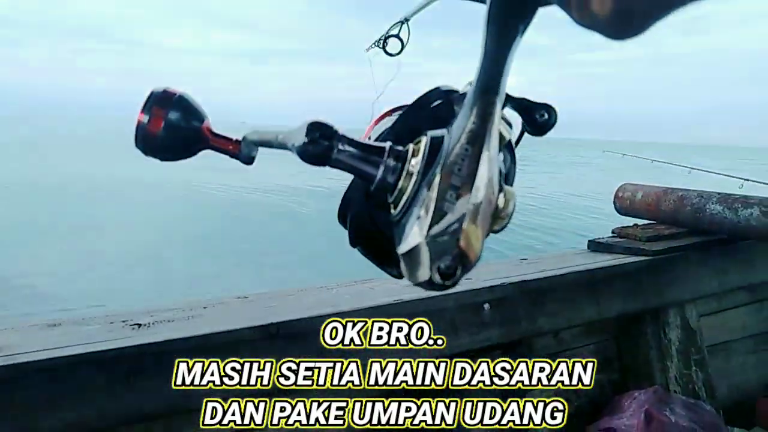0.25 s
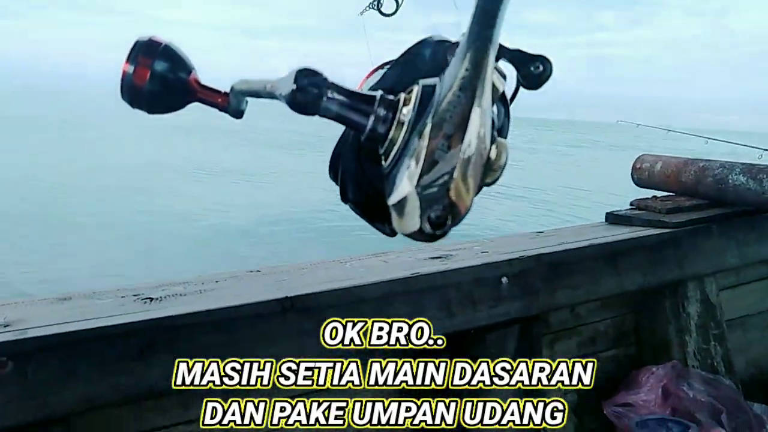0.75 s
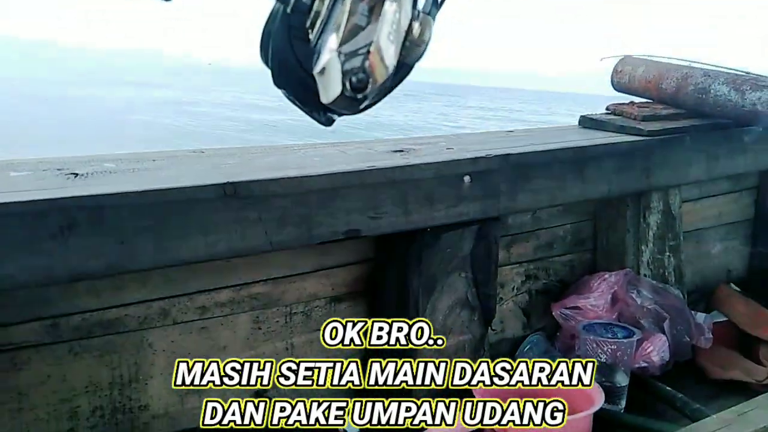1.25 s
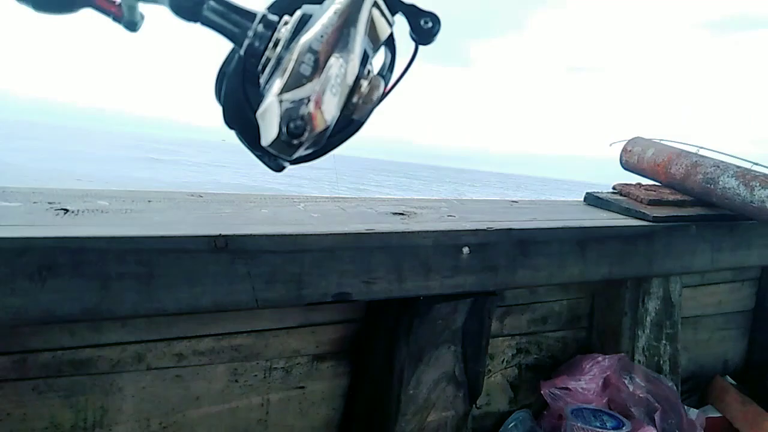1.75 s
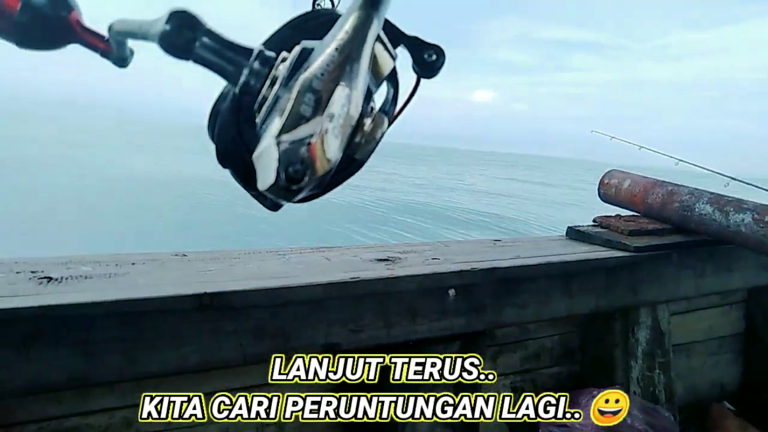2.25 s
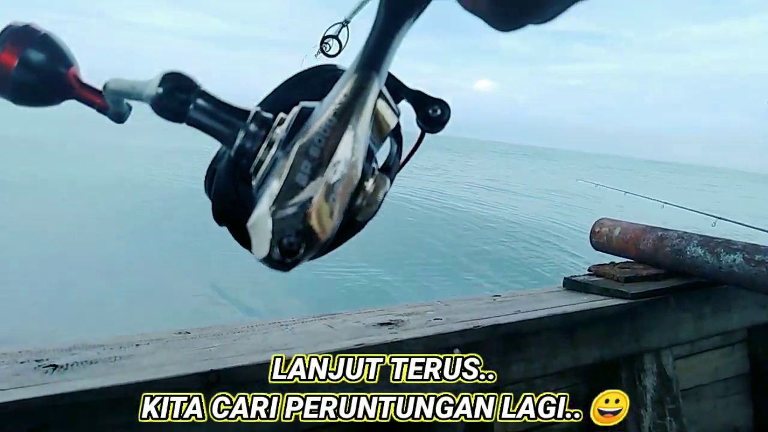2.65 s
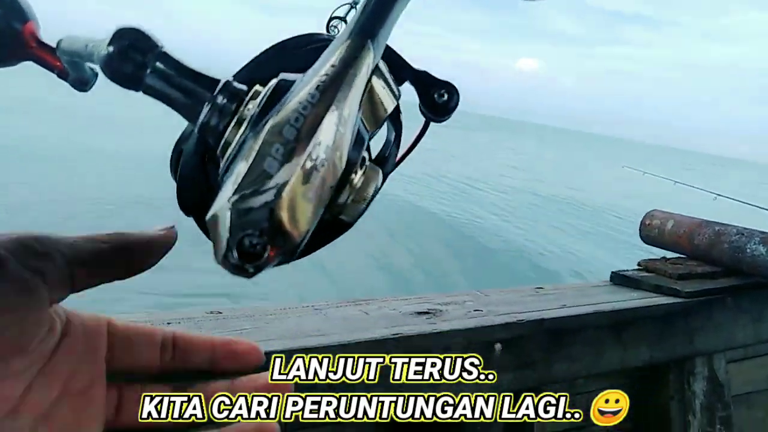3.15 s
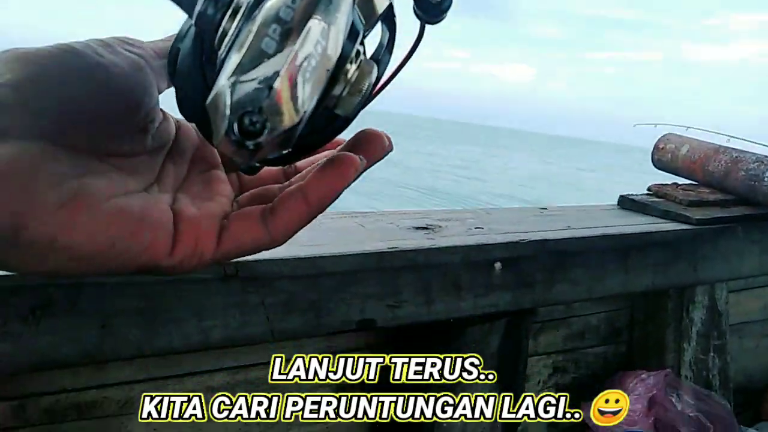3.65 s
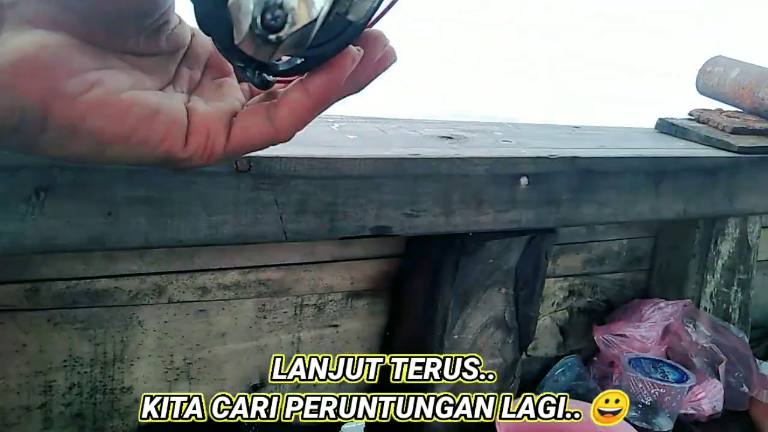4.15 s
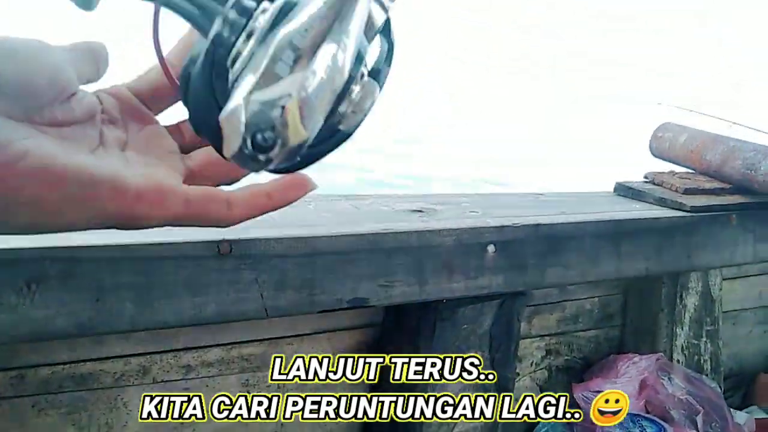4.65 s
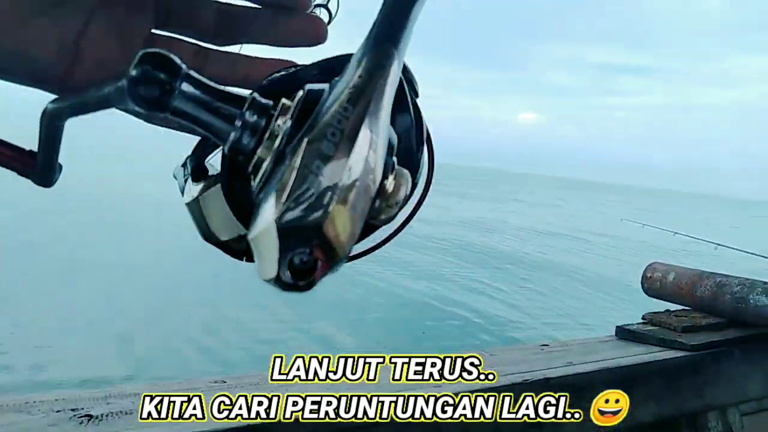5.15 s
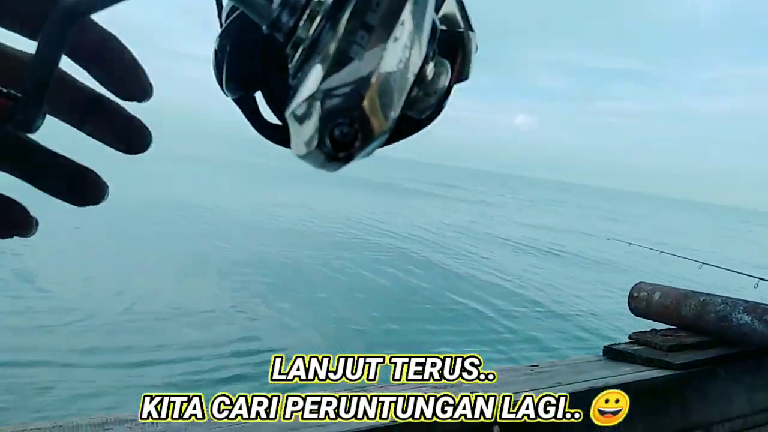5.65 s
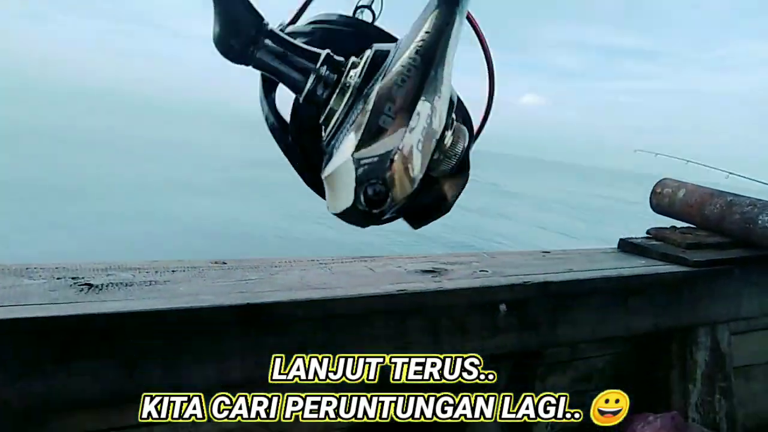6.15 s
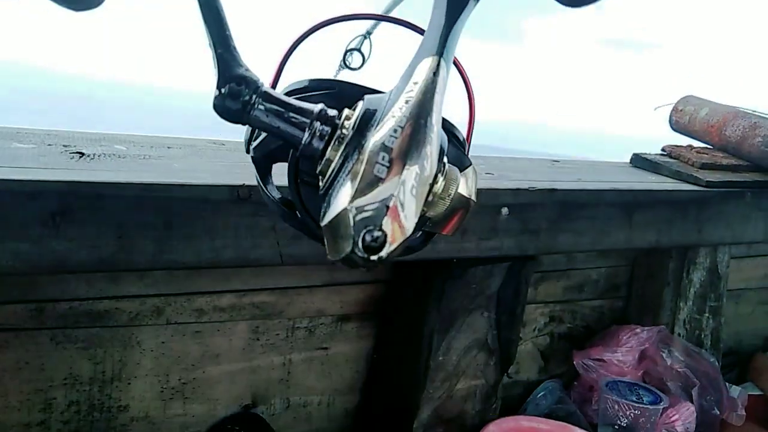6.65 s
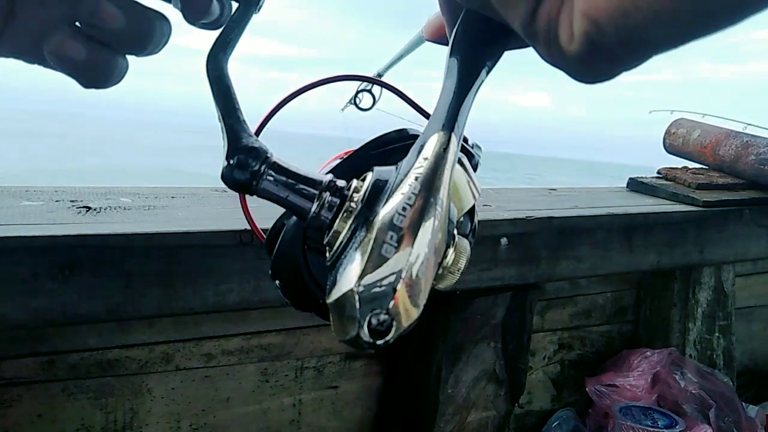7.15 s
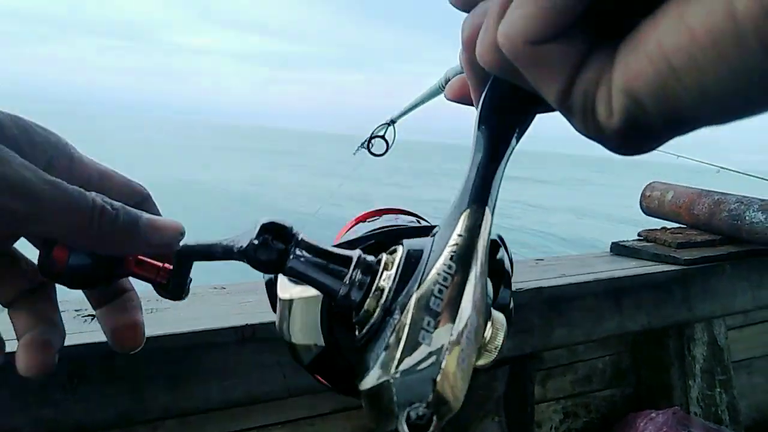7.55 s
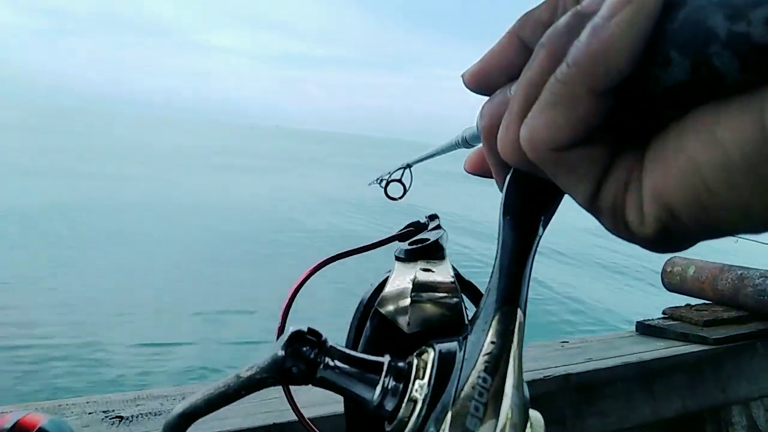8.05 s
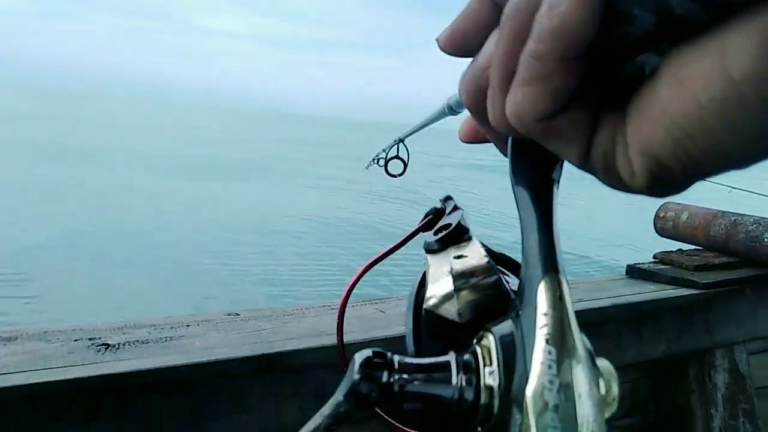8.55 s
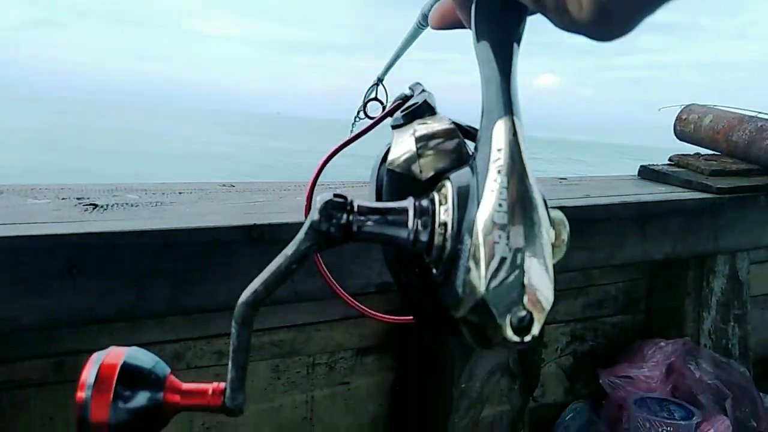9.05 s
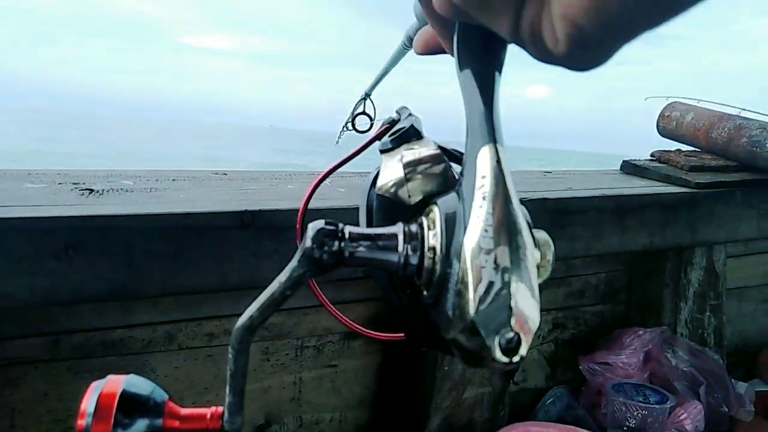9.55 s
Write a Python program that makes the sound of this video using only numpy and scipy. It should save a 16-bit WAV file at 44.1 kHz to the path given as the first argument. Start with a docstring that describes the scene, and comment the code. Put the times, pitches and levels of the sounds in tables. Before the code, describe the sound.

Low, nearly constant rumble and faint hiss lie under lively bubbling water against a hull. Irregular wavelets swell, slap and drain, leaving single plops in the lulls. Small reel ticks come and go nearby. A hard, bright metal clack bursts out just before the middle, briefly ducking everything after it. Late on, heavy tackle bangs hollow planks several times in quick succession. Close outdoor microphone, short boat echoes.

```python
"""Waves and a fishing reel on a wooden boat

Small waves slosh, slap and gurgle against the planks, over low rumble, sea wash and faint whistling hiss.
Water is coloured noise and swarms of dying sine bubbles; blows are decaying modes and noise bursts.
Close by, a reel ticks, its bail snaps shut and tackle knocks on the wood.
The recorder's peak limiter ducks the loudest hits and what follows them."""
import sys
import numpy as np
from scipy import signal
from scipy.io import wavfile

SR = 44100
rng = np.random.default_rng(int(sys.argv[2]) if len(sys.argv) > 2 else 0)


def transcribe(signal):
    """Save signal, clipped to [-1, 1], as a 16-bit WAV file at the path in sys.argv[1]."""
    frames = np.atleast_2d(signal).T
    limited = np.clip(frames, -1, 1)
    pcm = np.round(limited * 32767).astype(np.int16)
    wavfile.write(sys.argv[1], SR, pcm)


N = 432621
TIME = np.arange(N) / SR  # s
AGE = np.arange(SR * 2 // 5) / SR  # s since a hit
DURATION_S = TIME[-1]


def gain_of(db):
    """Decibels to amplitude."""
    return 10 ** (np.asarray(db) / 20)


def evened(x):
    """Scales to rms 1."""
    return x / np.sqrt(np.mean(x ** 2) + 1e-20)


def evened_hit(x):
    """Scales a hit to the energy of 10 ms at rms 1."""
    return x / np.sqrt(np.sum(x ** 2) / (SR / 100) + 1e-20)


def add(mix, start_s, sound):
    """Mixes a sound in at start_s, cut at the end of the mix."""
    part = mix[max(round(start_s * SR), 0):][:len(sound)]
    part += sound[:len(part)]


def colour(x, points, size=4096):
    """Causal minimum-phase filter through (Hz, dB) points, scaled to unit tap energy."""
    hz, db = np.transpose(points)
    bin_hz = abs(np.fft.fftfreq(size, 1 / SR)) + 1
    log_gain = np.log(gain_of(np.interp(np.log(bin_hz), np.log(hz), db)))
    spectrum = np.exp(np.conj(signal.hilbert(log_gain)))
    taps = np.fft.ifft(spectrum).real[:size // 2]
    return signal.oaconvolve(x, taps / np.linalg.norm(taps))[:len(x)]


def drift(per_s):
    """Random curve of rms 1, linear between per_s knots a second."""
    knots = rng.standard_normal(int(DURATION_S * per_s) + 2)
    return evened(np.interp(TIME * per_s, np.arange(len(knots)), knots))


def decay(t60_s):
    """Exponential envelope falling 60 dB in t60_s."""
    return np.exp(-np.log(1000) * AGE / t60_s)


def burst(fade_s, tail_db, tail_fade_s):
    """Noise that dies quickly and leaves a weaker tail."""
    envelope = np.exp(-AGE / fade_s) + gain_of(tail_db) * np.exp(-AGE / tail_fade_s)
    return rng.standard_normal(len(AGE)) * envelope


def ping(hz, t60_s, glide, rise_cycles):
    """Dying sine that swells over rise_cycles and bends by the share glide of its pitch."""
    turns = np.cumsum(hz * (1 + glide * np.minimum(AGE / t60_s, 1))) / SR
    swell = 1 - np.exp(-(AGE * hz / rise_cycles) ** 2)
    return swell * decay(t60_s) * np.sin(2 * np.pi * turns)


def ring(modes):
    """Struck body: each blow varies the level, sign and pitch of its modes."""
    out = np.zeros(len(AGE))
    for hz, db, t60_s in modes:
        force = gain_of(db + 2 * rng.standard_normal()) * rng.choice([-1, 1])
        out += force * ping(hz * rng.uniform(0.96, 1.02), t60_s, 0, 0.18)
    return evened_hit(out)


def boat(x, wet_db, t60_s):
    """Adds early echoes between the planks: random sparse taps after 3 ms."""
    sparse = (rng.random(len(AGE)) < .05) * (AGE > .003)
    taps = rng.standard_normal(len(AGE)) * sparse * decay(t60_s)
    return x + gain_of(wet_db) * signal.oaconvolve(x, taps / np.linalg.norm(taps))[:N]


# Rumble spectrum. Each row: frequency in Hz, relative density in dB per Hz.
RUMBLE_SPECTRUM = [(10, -16), (22, -3), (40, 0.5), (52, -4), (68, 3), (85, -6), (125, -5), (180, -11.5),
                   (270, -24.5), (500, -34), (1500, -77)]


def rumble(level_db=-43.5, heave_db=0.26):
    """Low-coloured noise, nearly steady in level."""
    heave = gain_of(heave_db * drift(9.6))
    return gain_of(level_db) * evened(colour(rng.standard_normal(N), RUMBLE_SPECTRUM, size=16384) * heave)


# Open-water spectrum. Each row: frequency in Hz, relative density in dB per Hz.
SEA_SPECTRUM = [(100, -35), (300, 7.5), (750, -1), (1200, -10), (2200, -5), (3500, -12), (5500, -16),
                (10000, -16.5), (15000, -12.5)]


def sea(level_db=-55.5, flicker_db=1):
    """Wash of open water: coloured noise with a flickering level."""
    flicker = gain_of(flicker_db * drift(23))
    return gain_of(level_db) * evened(colour(rng.standard_normal(N), SEA_SPECTRUM) * flicker)


# Faint hiss bands. Each row: start in seconds, end in seconds, centre in Hz, width in Hz, level in dB.
WHISTLE_BANDS = [(0.26, 2.16, 11900, 260, -66), (3.3, 4.4, 12150, 260, -71), (0.78, 1.87, 3190, 606, -61),
                 (5.95, 6.3, 2800, 1440, -63.5)]


def whistles():
    """Sines smeared into narrow hiss by random amplitude and phase; each swells and sinks."""
    out = np.zeros(N)
    for start_s, end_s, hz, width_hz, db in WHISTLE_BANDS:
        arch = np.sin(np.pi * np.clip((TIME - start_s) / (end_s - start_s), 0, 1))
        hiss = drift(width_hz) * np.sin(2 * np.pi * hz * TIME + drift(width_hz))
        out += gain_of(db) * arch * evened(hiss)
    return out


# Hollow hull blows. Each row: start in seconds, relative level in dB, pitch in Hz, t60 in seconds.
HULL_BLOWS = [(3.373, -35, 190, 0.22), (4.709, -20, 110, 0.082), (6.429, -23, 122, 0.036),
              (6.448, -27.5, 107, 0.071), (6.536, -30.5, 143, 0.047), (8.43, -27.5, 161.7, 0.31),
              (8.452, -28, 106.6, 0.24), (8.925, -22.5, 185.7, 0.6), (9.103, 0.5, 353, 0.049),
              (9.288, -20.5, 137, 0.059), (9.38, -32, 131.3, 0.06)]
# Plank shudder spectrum. Each row: frequency in Hz, relative density in dB per Hz.
HULL_SPECTRUM = [(30, -28), (90, -14), (170, 6.5), (260, -7), (450, -8.5), (900, -11.5), (2500, -36),
                 (6000, -65)]


def thumps(level_db=1, overtone_db=-10, shudder_db=-12):
    """Soft heavy blows: the hull booms in two modes and its planks shudder as noise."""
    out, shudder = np.zeros((2, N))
    for start_s, db, hz, t60_s in HULL_BLOWS:
        boom = ping(hz, t60_s, 0.11, 1.38) + gain_of(overtone_db) * ping(1.47 * hz, t60_s, 0, 0.7)
        add(out, start_s, gain_of(db) * boom / abs(boom).max())
        add(shudder, start_s, gain_of(db) * rng.standard_normal(len(AGE)) * decay(2 * t60_s))
    return gain_of(level_db) * out + gain_of(shudder_db) * colour(shudder, HULL_SPECTRUM)


# Tackle on wood. Each row: start in seconds, relative level in dB.
TACKLE_KNOCKS = [(8.899, -22), (8.914, -19.5), (8.925, -11.5), (8.938, -4.5), (8.952, -2.5), (9.042, -14.5),
                 (9.067, -17.5), (9.106, -6.5), (9.164, -30), (9.276, -24.5), (9.294, -17.5)]
# Plank modes. Each row: nominal frequency in Hz, nominal level in dB, t60 in seconds.
WOOD_MODES = [(217, -2.5, 0.1), (322, 9.5, 0.068), (393, 0.5, 0.18), (497, -3, 0.049), (580, 2, 0.056),
              (694, -10, 0.24), (818, -13, 0.14), (923, 2.5, 0.039), (1157, -13, 0.16), (1310, -7, 0.048),
              (1850, -23, .09), (2340, -21, 0.086), (3200, -20, 0.068)]
# Spectrum of moving water, also of dull thuds. Each row: frequency in Hz, relative density in dB per Hz.
WATER_SPECTRUM = [(100, -46.5), (250, -11.5), (400, -6.5), (510, 4.5), (640, 0.5), (720, 1.5), (800, 1),
                  (1000, -8), (1400, -16.5), (2500, -27), (6000, -55)]


def knocks(ring_db=-6, thud_db=-10):
    """Tackle on wood: a short noise thud and the ringing plank modes."""
    wood, thud = np.zeros((2, N))
    for start_s, db in TACKLE_KNOCKS:
        add(wood, start_s, gain_of(db) * ring(WOOD_MODES))
        add(thud, start_s, gain_of(db) * evened_hit(burst(.007, -7, .032)))
    return gain_of(ring_db) * wood + gain_of(thud_db) * colour(thud, WATER_SPECTRUM)


# Fingers shifting on the reel. Each row: start in seconds, end in seconds, mean tick level in dB.
HANDLING_SPANS = [(0, .3, -27), (2.462, 2.839, -33.5), (3.303, 3.889, -35.5), (5.103, 5.799, -35),
                  (6.638, 7.249, -43), (7.499, 8.106, -37)]


def fidgets(per_s=14, spread_db=3, fade_s=0.00073):
    """Rows of faint ticks at chance moments while the fingers shift."""
    rows = []
    for start_s, end_s, db in HANDLING_SPANS:
        span_s = end_s - start_s
        for place, size in rng.random((round(per_s * span_s), 2)):
            rows.append((start_s + place * span_s, db + spread_db * (2 * size - 1), fade_s))
    return rows


# Clearest reel ticks. Each row: start in seconds, relative level in dB, fade time in seconds.
REEL_TICKS = [(0.0463, -29, .002), (.196, -29.5, 0.0026), (0.766, -26, 0.0048), (3.328, -25.5, 0.00083),
              (3.363, -30, 0.0007), (3.608, -25, 0.00096), (3.986, -23, 0.00085), (5.143, -24, 0.0027),
              (5.217, -22, 0.0012), (5.304, -25.5, 0.00069), (5.691, -27, 0.00085), (5.811, -30, 0.0013),
              (5.8855, -29, .002), (5.899, -25.5, 0.0015), (6.415, -26.5, 0.0022), (7.1585, -29.5, 0.0012),
              (7.5486, -27, .0008), (7.6786, -28, 0.0011), (8.016, -23, 0.0044), (8.2018, -34, .0007)]
# Tick spectrum. Each row: frequency in Hz, relative density in dB per Hz.
TICK_SPECTRUM = [(500, -11), (3000, -3), (6000, -6), (8500, 1), (12000, -0.5), (15500, 7.5)]


def ticks(level_db=-16, tail_db=-7, tail_times=8.6):
    """Small reel contacts: soft-edged noise bursts with a rattle tail_times longer."""
    out = np.zeros(N)
    for start_s, db, fade_s in REEL_TICKS + fidgets():
        rise = 1 - np.exp(-2 * AGE / fade_s)
        add(out, start_s, gain_of(db) * evened_hit(burst(fade_s, tail_db, tail_times * fade_s) * rise))
    return gain_of(level_db) * colour(out, TICK_SPECTRUM)


# Hard metal contacts. Each row: start in seconds, relative level in dB, fade time in seconds,
# bail ring relative to the contact in dB.
METAL_SNAPS = [(4.6883, -6, 0.0014, -2), (4.693, 1.5, 0.0015, -22), (4.7003, -9, 0.0024, -8),
               (4.7089, 15, 0.00043, -16), (4.7287, -7.5, 0.002, -5), (6.362, -33.5, 0.019, -11),
               (6.702, -42, 0.04, 1), (8.902, -17, 0.022, -18), (8.935, 4, 0.0048, -25),
               (8.949, -15, 0.022, -19), (9.042, -28, 0.012, -11), (9.068, -22, 0.021, -13),
               (9.082, -26, 0.023, -15), (9.106, -23, 0.012, -18), (9.275, -32, 0.027, -18),
               (9.294, -20, 0.013, -31)]
# Bail wire modes. Each row: nominal frequency in Hz, nominal level in dB, t60 in seconds.
BAIL_MODES = [(2340, -8, 0.048), (2550, -9, 0.12), (2660, 7, 0.016), (3150, 2, 0.027), (3880, -12, 0.043)]
# Metal contact spectrum. Each row: frequency in Hz, relative density in dB per Hz.
METAL_SPECTRUM = [(200, -29), (1200, -5), (2600, -7.5), (4000, -7.5), (6000, -11.5), (7400, -10.5),
                  (8500, -5.5), (10000, -7.5), (13000, -4.5), (15500, -7.5)]


def snaps(bail_db=-15, snap_db=-7):
    """Hard metal contacts: sharp noise bursts that set the bail wire ringing."""
    contacts, wire = np.zeros((2, N))
    for start_s, db, fade_s, ring_db in METAL_SNAPS:
        rise = 1 - np.exp(-AGE / 0.00016)
        add(contacts, start_s, gain_of(db) * burst(fade_s, -18, 0.011) * rise)
        add(wire, start_s, gain_of(db + ring_db) * ring(BAIL_MODES))
    return gain_of(snap_db) * colour(contacts, METAL_SPECTRUM) + gain_of(bail_db) * wire


# Low swings. Each row: start in seconds, level in dB, rise time in seconds, fade time in seconds.
LOW_SWINGS = [(4.7084, -5, 0.0005, 0.024), (6.189, -12, 0.0044, 0.008)]


def low_swings():
    """Low swings: the loud snap overloads the recorder, and the microphone is bumped once."""
    out = np.zeros(N)
    for start_s, db, rise_s, fade_s in LOW_SWINGS:
        swing = (1 - AGE / fade_s) * np.exp(-AGE / fade_s)
        add(out, start_s, gain_of(db) * swing * (1 - np.exp(-AGE / rise_s)))
    return out


# Loudest gurgles. Each row: start in seconds, relative level in dB, starting pitch in Hz, t60 in seconds.
LOUD_GURGLES = [(.1, -33, 517, 0.6), (.2, -24, 1350, 0.043), (1.095, -36, 795, 0.17),
                (1.55, -35.5, 484, 0.44), (1.629, -36, 407, 0.19), (2.383, -26.5, 730, .059),
                (2.52, -28, 519, .11), (3.257, -40, 1650, .08), (3.29, -33, 490, 0.084),
                (3.387, -24.5, 400, 0.23), (3.495, -41.5, 1330, .1), (3.756, -43.5, 1262, 0.25),
                (3.862, -38.5, 790, 0.16), (3.98, -30, 491, 0.26), (4.04, -32, 516.4, 0.22),
                (4.112, -31.5, 813, 0.062), (4.2, -36, 842, 0.11), (5.786, -36.5, 3620, 0.048),
                (5.905, -35, 1180, 0.12), (6.415, -39, 650, 0.15), (6.555, -39.5, 497, 0.39),
                (6.62, -38, 531, 0.25), (6.728, -38, 450, 0.12), (7.125, -29.5, 1315, 0.064),
                (8.55, -34.5, 398, 0.37), (9.39, -33, 1200, .1), (9.623, -31, 640, .12)]


def gurgles(level_db=-1, clear=0.88, plop_db=-10, glide=-0.064, glide_spread=0.069,
            stray_db=-44, stray_low_hz=600, stray_cycles=110, count=30):
    """Loud bubbles plop and ring, gliding and fluttering; fainter ones stray between."""
    out, plops = np.zeros((2, N))
    for start_s, db, hz, t60_s in LOUD_GURGLES:
        add(out, start_s, gain_of(db) * ping(hz, t60_s, glide + glide_spread * rng.standard_normal(), 3.6))
        add(plops, start_s, gain_of(db) * evened_hit(burst(.004, -9, .018)))
    for order, (place, pitch, bend) in enumerate(rng.random((count, 3))):
        hz = stray_low_hz * 3 ** pitch
        stray = ping(hz, stray_cycles / hz, .5 * (bend - .5), 1.6)
        add(out, (order + place) / count * DURATION_S, gain_of(stray_db) * stray)
    flutter = .7 * drift(130)
    return gain_of(level_db) * out * (clear + flutter) + gain_of(plop_db) * colour(plops, WATER_SPECTRUM)


# Waves along the hull. Each row: arrival in seconds, crest in seconds, relative crest level in dB,
# froth relative to it in dB, draining in dB per second.
HULL_WAVES = [(0, .25, -44.5, -8, 24), (0.896, 1.154, -57.5, 5.5, 60), (1.518, 1.642, -46.5, -11, 40),
              (1.913, 2.16, -41, -2.5, 121), (2.524, 3.057, -39, -7, 216.5), (3.361, 3.39, -43.5, 0, 93),
              (3.604, 3.794, -59, 6, 87), (3.982, 4.117, -46, -26, 71), (4.312, 4.693, -44.5, -2.5, 148),
              (5.08, 5.517, -37, -5.5, 149), (5.92, 5.94, -47.5, -1, 157), (6.407, 6.683, -51, -19, 76),
              (6.899, 7.1, -44, -4.5, 71), (7.696, 8.067, -40, -8.5, 101), (8.444, 8.54, -55, -6, 67.5),
              (9.468, 9.694, -42, -3, 66)]


def surge(onset_db_per_s=134.5, build_db=5.5, calm_db=-61.5, calm_froth_db=-61):
    """Amplitudes of water and froth: each wave arrives fast, builds to a crest and drains."""
    body, froth = np.full(N, gain_of(calm_db) ** 2), np.full(N, gain_of(calm_froth_db) ** 2)
    for arrival_s, crest_s, db, froth_db, drain_db_per_s in HULL_WAVES:
        shape_db = np.interp(TIME, [arrival_s, crest_s], [-build_db, 0])
        shape_db -= onset_db_per_s * np.maximum(arrival_s - TIME, 0)
        shape_db -= drain_db_per_s * np.maximum(TIME - crest_s, 0)
        power = gain_of(db + np.maximum(shape_db, -80)) ** 2
        body += power
        froth += power * gain_of(froth_db) ** 2
    return np.sqrt(body), np.sqrt(froth)


def bubbles(low_hz, high_hz, per_s, cycles, spread_db, count=36):
    """Swarm of small ringing bubbles in count sizes, strengths spread by spread_db."""
    out = np.zeros(N)
    for hz in np.geomspace(low_hz, high_hz, count):
        place, strength = rng.random((int(per_s * DURATION_S / count), 2)).T
        train = np.zeros(N)
        train[(place * N).astype(int)] = gain_of(spread_db * np.minimum(-np.log(strength), 3.5))
        t60_s = cycles * rng.uniform(0.49, 2.4) / hz
        pop = ping(hz, t60_s, rng.uniform(-0.22, 0.19), 0.45)[:SR // 10]
        out += signal.oaconvolve(train, evened_hit(pop) * np.sqrt(hz))[:N]
    return out


# Splash spectrum. Each row: frequency in Hz, relative density in dB per Hz.
SPLASH_SPECTRUM = [(300, -35), (800, 2.5), (1300, 5), (1700, -2), (2400, -7.5), (3400, -13.5),
                   (4500, -16.5), (6500, -28.5), (10000, -25), (15000, -44)]


def slosh(flow, foam, body_db=-.5, froth_db=-4, blip_db=-61, blip_follow=0.29, churn_db=1.0):
    """Bubble swarms swell and sink with each wave; single blips go on in the lulls."""
    body = evened(colour(bubbles(290.4, 1685, per_s=750, cycles=17.5, spread_db=0.5), WATER_SPECTRUM))
    fizz = evened(colour(bubbles(900, 13000, per_s=2200, cycles=16, spread_db=2.3), SPLASH_SPECTRUM))
    blips = evened(colour(bubbles(550, 4500, per_s=110, cycles=42, spread_db=3.5), SPLASH_SPECTRUM))
    churn = gain_of(churn_db * drift(22))
    waves = churn * (gain_of(body_db) * flow * body + gain_of(froth_db) * foam * fizz)
    blip_level = gain_of(blip_db) * (flow / np.median(flow)) ** blip_follow
    return waves + blip_level * blips


def wavelets(flow, foam, per_s=9, splash_db=10.5, body_db=4, spread_db=4, low_hz=480):
    """Rows of lesser slaps at chance moments, their levels following the wave that carries them."""
    rows = []
    for order, (place, size, pitch) in enumerate(rng.random((int(per_s * DURATION_S) + 1, 3))):
        start_s = (order + place) / per_s
        if start_s < DURATION_S:
            at, size_db = int(start_s * SR), spread_db * (2 * size - 1)
            top_db = 20 * np.log10(foam[at]) + splash_db + size_db
            low_db = 20 * np.log10(flow[at]) + body_db + size_db
            rows.append((start_s, top_db, low_db, low_hz * 2 ** pitch))
    return rows


def droplets(count=12):
    """Bubbles pinched off by one breaking wavelet, the first at the impact."""
    out = np.zeros(len(AGE))
    for order, (pitch, wait, cycles, glide) in enumerate(rng.random((count, 4))):
        hz, delay_s = 850 * 2.7 ** pitch, order * .006 * wait
        drop = ping(hz, (10 + 30 * cycles) / hz, 1.3 * glide - .15, 0.077)
        add(out, delay_s, np.exp(-delay_s / 0.022) * drop)
    return evened_hit(out)


# Hardest wavelets on the planks. Each row: start in seconds, relative splash level in dB,
# relative body level in dB, starting pitch of the trapped air in Hz.
HARD_SLAPS = [(.2613, -36, -37.5, 622), (2.1026, -34, -38, 650), (2.167, -30.5, -35.5, 950),
              (2.2273, -30, -36.5, 924), (2.6698, -32, -35.5, 511), (2.747, -30.5, -36.5, 840),
              (2.8532, -33, -27.5, 503), (2.8805, -31.5, -25, 557), (2.9317, -33, -32.5, 640),
              (3.0061, -35, -31.5, 820), (3.0609, -36, -31.5, 820), (3.137, -41.5, -48, 627),
              (3.3756, -39, -36, 763), (3.4, -40, -37, 640), (4.4891, -28, -32, 609),
              (4.6079, -26, -37, 645), (5.1891, -31.5, -31.5, 514), (5.2712, -31, -32, 642),
              (5.444, -27, -38, 590), (5.4884, -49, -29.5, 564), (6.361, -32, -39, 830),
              (6.537, -35, -40, 600), (6.6995, -34.5, -48, 810), (7.0704, -37, -43, 1300),
              (7.0978, -36, -37, 639), (7.1235, -28.5, -46, 800), (7.663, -33.5, -30.5, 613),
              (7.809, -28, -36, 523), (7.864, -28.5, -35, 1180), (8.0141, -24, -30.5, 521),
              (8.099, -28, -31.5, 617), (8.1728, -34, -41, 673)]


def slaps(rows, splash_db=-9, body_db=-2, air_db=-3, drops_db=-7):
    """Each wavelet cracks on the wood, pushes on the planks and traps ringing air."""
    splash, body, air = np.zeros((3, N))
    for start_s, top_db, low_db, hz in rows:
        crack = burst(.0025, -6.5, 0.019) * gain_of(2.1 * rng.standard_normal(len(AGE)))
        push = burst(.004, -1, .02)
        pocket = ping(hz, 0.13, rng.uniform(-0.12, 0.048), 0.74)
        add(splash, start_s, gain_of(top_db) * evened_hit(crack))
        add(body, start_s, gain_of(low_db) * evened_hit(push))
        add(air, start_s, gain_of(low_db + air_db) * evened_hit(pocket))
        add(air, start_s, gain_of(top_db + drops_db) * droplets())
    splash = gain_of(splash_db) * colour(splash, SPLASH_SPECTRUM)
    return splash + gain_of(body_db) * colour(body, WATER_SPECTRUM) + air


def scene():
    """Open sea around, blows and tackle inside, water outside the planks."""
    flow, foam = surge()
    background = rumble() + sea() + whistles()
    blows = boat(thumps() + knocks(), wet_db=-9.0, t60_s=0.25)
    reel = boat(ticks() + snaps() + low_swings(), wet_db=-24.5, t60_s=0.29)
    all_slaps = slaps(HARD_SLAPS + wavelets(flow, foam))
    water = boat(slosh(flow, foam) + gurgles() + all_slaps, wet_db=-8.0, t60_s=0.086)
    return (background + blows + reel + water)[None]


def record(dry, port_hz=8500, port_q=7, port_db=5, limit_db=-3.5, recovery_db_per_s=12, edge_hz=15650):
    """The microphone port rings, a peak limiter ducks at once and recovers slowly, then a low-pass."""
    x = dry[0] + gain_of(port_db) * signal.lfilter(*signal.iirpeak(port_hz, port_q, SR), dry[0])
    over_db = np.maximum(20 * np.log10(abs(x) + 1e-9) - limit_db, 0)
    fall_db = TIME * recovery_db_per_s
    duck_db = np.maximum.accumulate(over_db + fall_db) - fall_db
    x = x / gain_of(duck_db)
    low_pass = signal.firwin(401, edge_hz, window=("kaiser", 8), fs=SR)
    return signal.oaconvolve(x, low_pass, "same")[None]


dry = scene()
out = record(dry)
transcribe(out)
```